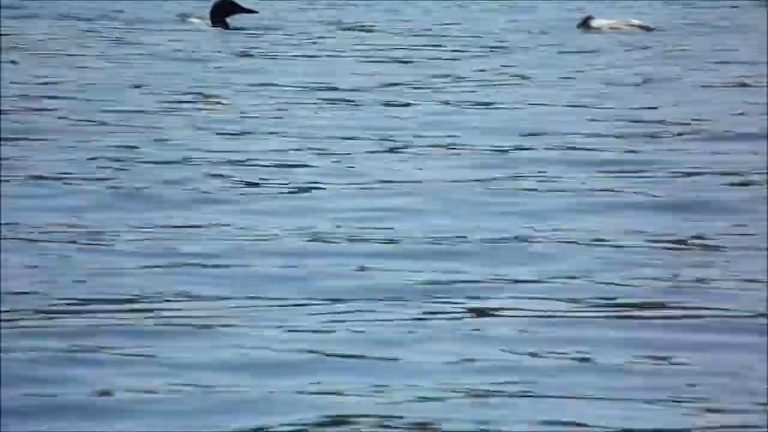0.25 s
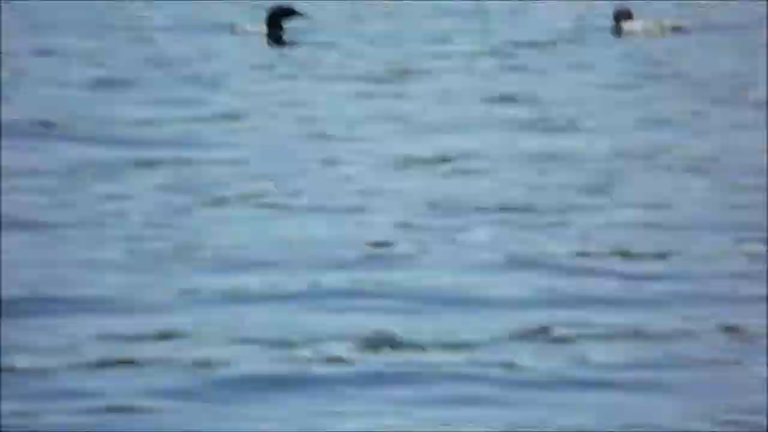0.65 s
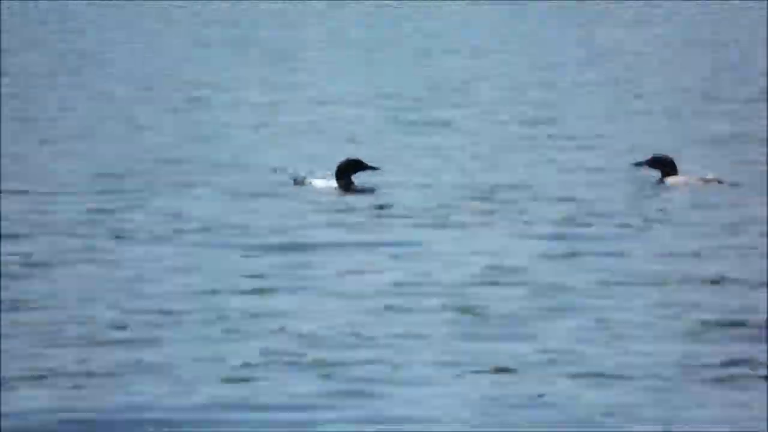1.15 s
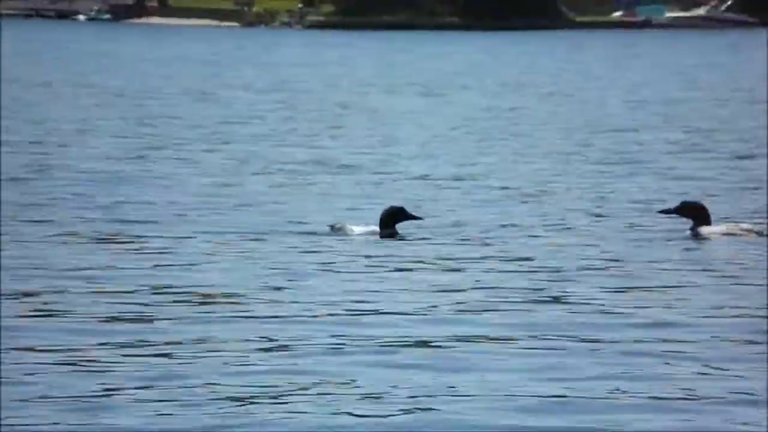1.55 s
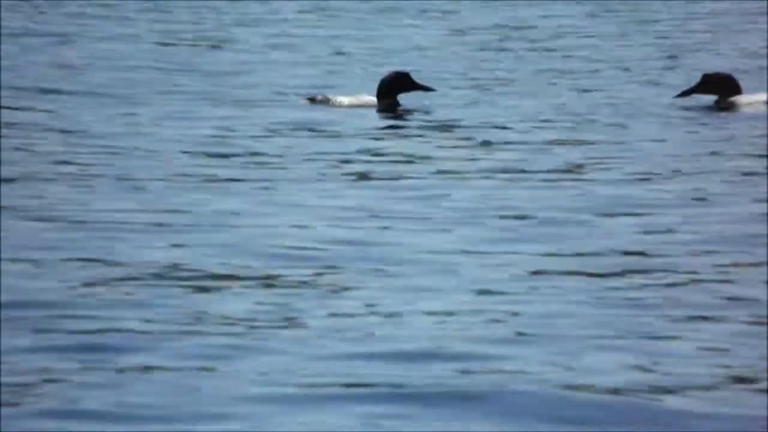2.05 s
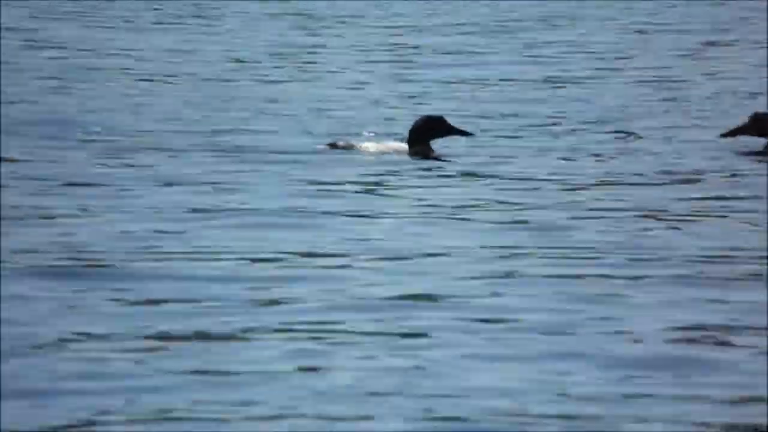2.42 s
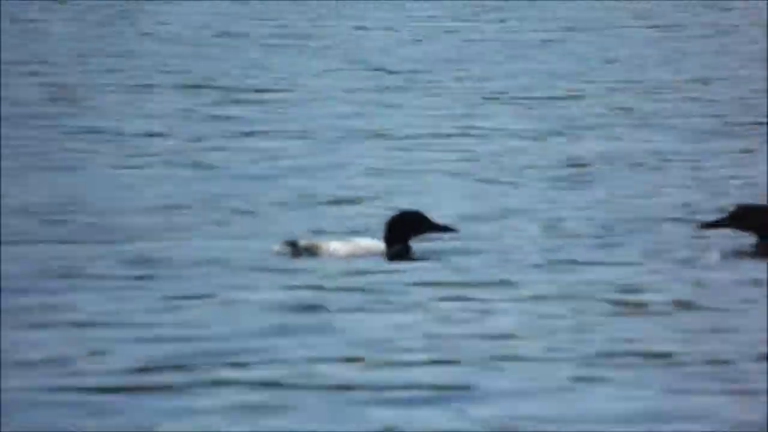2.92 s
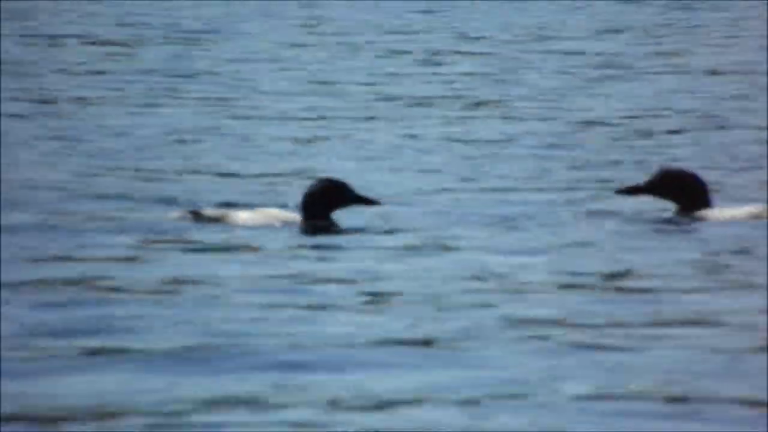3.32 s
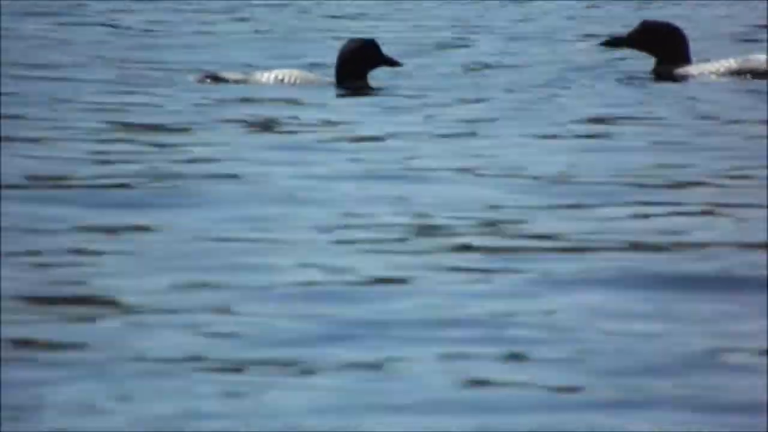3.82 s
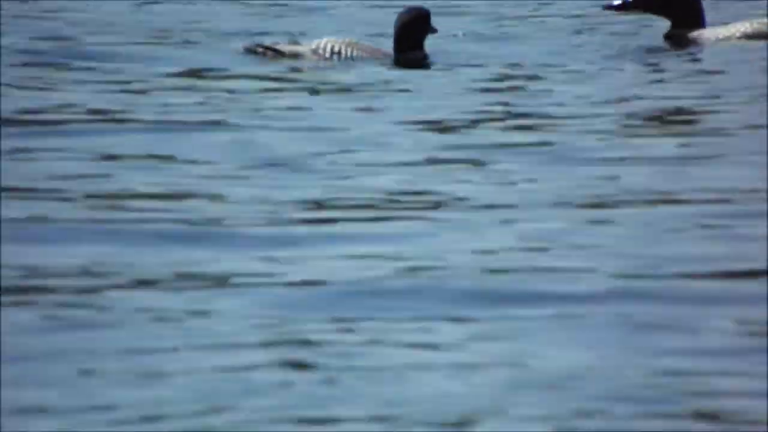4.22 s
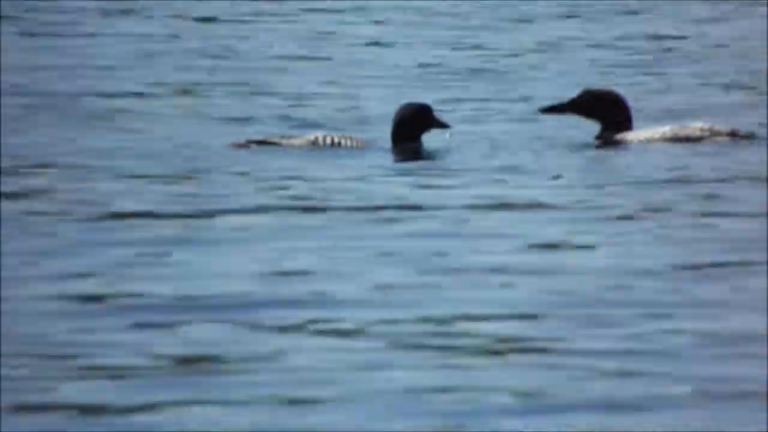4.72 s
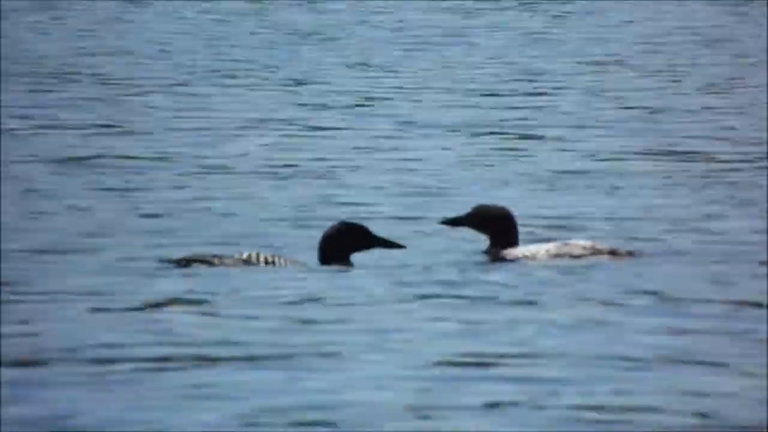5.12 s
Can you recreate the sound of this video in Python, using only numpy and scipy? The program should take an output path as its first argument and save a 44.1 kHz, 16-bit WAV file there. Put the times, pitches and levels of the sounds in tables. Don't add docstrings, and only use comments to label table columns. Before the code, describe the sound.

On a quiet lake, a small camera's built-in microphone picks up faint air, hiss and thin electronic whistle. Fingertips tick softly, then the zoom lever clicks and chatters sharply. A small gear motor rattles the plastic shell for about two seconds, its lens barrel squealing on one wavering note, before it coasts down to scattered clicks, rubs and a faint low bump.

```python
import sys
import numpy as np
from scipy import signal
from scipy.fft import rfft, irfft, next_fast_len
from scipy.io import wavfile
from scipy.ndimage import uniform_filter1d, map_coordinates

SR = 44100
rng = np.random.default_rng(int(sys.argv[2]) if len(sys.argv) > 2 else 0)


def convert_level_to_amplitude(level_db):
    exponent = np.asarray(level_db, float) / 20
    return 10 ** exponent


def to_wav(sig):
    pcm = np.clip(np.atleast_2d(sig), -1, 1) * 32767
    pcm = np.round(pcm).astype(np.int16)
    wavfile.write(sys.argv[1], SR, pcm.T)


N = 236351


def unit(x):
    return x / np.sqrt(np.mean(x ** 2) + 1e-20)


def along(points, hz):
    f, v = np.transpose(points)
    return convert_level_to_amplitude(np.interp(np.log(hz + 1), np.log(f + 1), v))


def wobble(rate):
    knots = rng.standard_normal(int(N * rate / SR) + 4)
    return map_coordinates(knots, [np.arange(N) * rate / SR])


def filtered(x, response):
    m = 2 * next_fast_len(len(x) // 2 + 4096)
    return irfft(rfft(x, m) * response(np.fft.rfftfreq(m, 1 / SR)), m)[:len(x)]


def causal(points):
    def response(hz):
        cepstrum = irfft(np.log(along(points, hz) + 1e-6))
        half = len(cepstrum) // 2
        return np.exp(rfft(np.r_[cepstrum[0], 2 * cepstrum[1:half], cepstrum[half], np.zeros(half - 1)]))
    return response


# [f/Hz, level/dB per Hz]
LAKE_AIR = [(15, -52), (25, -29), (183, -9), (305, -5.5), (359, -7), (762, -2.5), (1570, -7.5),
            (1710, -11.5), (2250, -5), (2600, 2), (3090, -13.5), (7100, -20.5), (9300, -19.5), (10100, -19),
            (10900, -21), (15500, -23)]
# [multiple of its speed, level/dB]
DRIVE_HUM = [(2, -94.5), (3, -82.5), (4, -71), (8, -85), (10, -75.5), (12, -83)]
# [f/Hz, level/dB]
ELECTRONICS = [(9778.7, -64), (11714.6, -95)]
AIR_DB, DRIVE_HZ = -59, 77.2


def background():
    t = np.arange(N) / SR
    noise = filtered(rng.standard_normal(N), lambda hz: along(LAKE_AIR, hz))
    air = convert_level_to_amplitude(AIR_DB + 0.3 * wobble(8)) * unit(noise)
    spin = 2 * np.pi * DRIVE_HZ * t + 0.06 * wobble(5.8)
    hum = sum(convert_level_to_amplitude(db + 1.5 * wobble(6)) * np.sin(k * spin) for k, db in DRIVE_HUM)
    whistle = sum(convert_level_to_amplitude(db) * np.sin(2 * np.pi * hz * t) for hz, db in ELECTRONICS)
    return air + np.sqrt(2) * (hum + whistle)


def through_shell(x):
    return filtered(x, causal([(20, -69), (150, -19.5), (300, 2), (2850, -5), (3400, -8), (6000, -42), (12000, -49)]))


# [f/Hz, t60/s, level/dB]
LOW_MODES = [(328, 0.0081, -8.5), (695, 0.014, -3), (894, 0.018, 3)]
MIDDLE_MODES = [(1190, 0.03, 1), (1344, 0.026, 3), (1580, 0.033, -2.5)]
HIGH_MODES = [(1980, 0.016, -3), (2300, 0.018, 1.5), (2545, 0.022, 0), (2900, 0.041, -20.5)]
# [f/Hz, level/dB]
CRACK = [(2500, -52), (3600, -0.5), (4600, -8), (6000, -15), (9000, -21), (14000, -39)]


def blows(contacts, rings_for=0.88):
    rings, cracks, t = np.zeros(N), np.zeros(N), np.arange(SR // 10) / SR
    modes = np.array(LOW_MODES + MIDDLE_MODES + HIGH_MODES)
    group = np.repeat([-1, 0, 1], [len(LOW_MODES), len(MIDDLE_MODES), len(HIGH_MODES)])[:, None]
    t60 = rings_for * modes[:, 1:2]
    for s, db, tilt_db, crack_db in contacts:
        hz = modes[:, :1] * (1 + 0.015 * rng.standard_normal((len(modes), 1)))
        level_db = modes[:, 2:] + tilt_db * group + 2 * rng.standard_normal((len(modes), 1))
        decay = convert_level_to_amplitude(level_db - 60 * (t / t60) ** 1.026)
        ring = np.sum(decay * np.sin(2 * np.pi * hz * t), axis=0)
        start = round((s + 0.000991) * SR)
        rings[start:][:len(t)] += convert_level_to_amplitude(db + 0.5) * ring * (1 - np.exp(-t / 0.0004))
        burst = convert_level_to_amplitude(db + crack_db + 10.5 - 60 * t / (rings_for * 0.019))
        cracks[start:][:len(t)] += burst * rng.standard_normal(len(t))
    return through_shell(rings) + filtered(cracks, causal(CRACK))


# [t/s, level/dB, tilt/dB toward the high modes]
TICKS = [(0.169, -57, -1), (0.593, -50, -3), (0.637, -50, -5), (0.703, -47, -4.5), (0.818, -61, -3),
         (0.879, -49, -5), (1.307, -51, -9), (3.895, -54.5, -13), (4.184, -51, -8), (4.199, -52, 6),
         (4.367, -52.5, -6), (4.412, -56.5, -10), (4.602, -43, -1.5), (4.907, -46.5, -8), (4.937, -43, -2),
         (4.955, -49.5, -17.5), (4.965, -51, -16), (5.009, -45, -3)]


def fingertips():
    return blows([(*row, -16) for row in TICKS])


def spots(hits):
    out, t = np.zeros(N), np.arange(SR // 10) / SR
    damped = convert_level_to_amplitude(-60 * (t / 0.016) ** 1.62) * (1 - np.exp(-t / 0.00045))
    for s, low_hz, low_db, high_hz, high_db in hits:
        low = convert_level_to_amplitude(low_db) * np.sin(2 * np.pi * low_hz * t)
        high = convert_level_to_amplitude(high_db) * np.sin(2 * np.pi * high_hz * t)
        out[round((s + 0.0012) * SR):][:len(t)] += (low + high) * damped
    return through_shell(out)


# [t/s, level/dB, tilt/dB toward the
# high modes, crack level/dB]
CLICKS = [(1.028, -27, 6, -27), (1.323, -37, 10.5, -29), (1.347, -39.5, 7, -21), (1.366, -40, 4, -10),
          (1.404, -33.5, 5, -29), (1.417, -37, 4, -19), (1.439, -19, -4, -4.5), (1.495, -36, 5, -14),
          (1.515, -31.5, 7.5, -13), (1.56, -35.5, 5.5, -13), (1.572, -47, 6, -16), (1.74, -38.5, 7, -22),
          (1.612, -29, 3, -30), (1.622, -31.5, 14, -29), (1.629, -16.5, -0.3, -9.5), (1.644, -47, -2, -21),
          (1.653, -36, 16, -7), (1.663, -17.5, 9, -19), (1.774, -37, 5, -21), (1.981, -21.5, 2, -9.5),
          (3.144, -20.5, 3.5, -20), (3.635, -32, 5.5, -11), (4.148, -30.5, 0, -15), (4.285, -28, 7.5, 2),
          (4.316, -37, 1, -26), (4.457, -20, 1.4, -8.5), (4.79, -37, 3.5, -23), (4.848, -41.5, 5.5, -26)]
# [t/s, lower f/Hz, its level/dB, upper f/Hz, its level/dB]
LEVER_SPOTS = [(1.028, 960, -30.5, 2520, -20.5), (1.323, 720, -33.5, 2480, -30),
               (1.402, 860, -31, 1580, -27), (1.441, 820, -15, 2640, -24.5),
               (1.513, 1080, -23.5, 2536, -22), (1.629, 1113, -12.5, 2070, -21),
               (1.663, 1250, -18, 2455, -28), (1.981, 870, -23.5, 1780, -26.5),
               (3.144, 1190, -9.5, 1470, -15), (3.633, 1210, -32, 2400, -39), (4.148, 1123, -21, 2680, -31),
               (4.284, 1580, -19.5, 2650, -9.5), (4.285, 2300, -19.5, 2960, -15),
               (1.029, 1250, -38, 1540, -28.5), (1.441, 670, -40, 5150, -10),
               (4.457, 1153, -15, 2020, -16.5), (4.149, 694, -38.5, 3300, -34.5),
               (4.456, 1580, -10.5, 2390, -9), (4.79, 1110, -31, 1505, -29),
               (4.848, 1600, -35.5, 2300, -36)]


def zoom_lever():
    return blows(CLICKS) + spots(LEVER_SPOTS)


# [t/s, rise/s, fall/s, thud level/dB, rub level/dB]
GRIP = [
    (1.37, 0.063, 0.021, -54, -52),
    (1.445, 0.036, 0.13, -59, -48),
    (3.515, 0.044, 0.047, -75, -47.5),
    (3.57, 0.018, .04, -70, -46.5),
    (3.615, 0.052, .045, -48, -51),
    (4.205, .01, .025, -65, -57.5),
    (4.265, 0.079, 0.064, -74, -52),
    (4.908, 0.033, .04, -48.5, -60),
    (4.95, 0.042, 0.23, -54, -57),
]
# [f/Hz, level/dB]
THUD = [(20, -34), (45, -20), (120, -15), (280, 7.5), (450, -2.5), (900, -46.5)]
# [f/Hz, level/dB]
RUB = [(250, -20), (500, -0.5), (850, -3), (1600, -12.5), (1800, -16), (2550, -6), (3200, -25.5),
       (6000, -50)]
GRIP_SLOPE_DB = 16


def grip():
    t, push, slide = np.arange(N) / SR, 0, 0
    for s, rise, fall, thud_db, rub_db in GRIP:
        away = np.where(t < s, (s - t) / rise, (t - s) / fall)
        shift = convert_level_to_amplitude(-GRIP_SLOPE_DB * away) * (away < 1.5)
        push = push + convert_level_to_amplitude(thud_db) * shift
        slide = slide + convert_level_to_amplitude(rub_db) * shift
    thud = unit(convert_level_to_amplitude(3.8 * wobble(25)) * filtered(rng.standard_normal(N), causal(THUD)))
    rub = unit(convert_level_to_amplitude(4.5 * wobble(100)) * filtered(rng.standard_normal(N), causal(RUB)))
    return convert_level_to_amplitude(-3) * push * thud + slide * rub


# [first t/s, gap/s, next gap over it, level/dB, level change/dB a contact]
CHATTER = [
    (1.4466, .0068, 1.01, -31, -1.1),
    (1.526, 0.011, 0.96, -38, -0.5),
    (1.699, .012, .92, -40, 0.36),
]
CHATTER_TILT_DB = [-1.5, 6, 8.5]
CONTACTS = [7, 3, 8]
# [lower f/Hz, level/dB over the contact, upper f/Hz, level/dB over it]
SPRING = (1020, 3, 2560, -8)


def chatter():
    rows = []
    for (s, gap, ratio, db, step_db), tilt_db, count in zip(CHATTER, CHATTER_TILT_DB, CONTACTS):
        for k in range(count):
            rows.append((s, db + step_db * k - 2.5 * (k % 2), tilt_db, -18))
            s += gap * ratio ** k
    low_hz, low_db, high_hz, high_db = SPRING
    spring = [(s, low_hz, db + low_db, high_hz, db + high_db) for s, db, *_ in rows[:CONTACTS[0]]]
    return blows(rows, rings_for=0.65) + spots(spring)


def teeth(rate_hz, jitter, scatter_db, noisy):
    turns = np.cumsum(rate_hz * (1 + jitter * wobble(60))) / SR
    meets = np.diff(np.floor(turns), prepend=0) * convert_level_to_amplitude(scatter_db * wobble(120))
    u = np.arange(SR // 20) / SR / 0.0021
    scrape = signal.fftconvolve(meets, u * np.exp(-u))[:N]
    knock = 0.4 * unit(meets)
    return (unit(np.abs(scrape)) + noisy) * rng.standard_normal(N) + knock


# [f/Hz, level/dB per Hz]
SHELL = [(560, -43), (960, -11), (1080, -7), (1170, -1.5), (1390, -9.5), (1610, -6), (1940, -11.5),
         (2210, -11), (2390, 0), (2520, 1), (2740, -13), (2950, -6.5), (3240, -20), (3850, -23),
         (4250, -32.5), (4580, -27.5), (5500, -41.5), (7150, -70.5)]
# [f/Hz, level/dB]
GRIT = [(4000, -25.5), (5700, 12), (6500, 11.5), (8300, 12), (10000, -9), (13000, -26)]
# [f/Hz, level/dB per Hz]
SHUDDER = [(18, -72), (30, -35.5), (202, -11), (453, -8), (509, -1), (590, -6.5), (683, -1), (839, -4.5),
           (929, -13.5), (1000, -6.5), (1300, -35), (2200, -120)]
ENGAGE_S, RUN_S, OFF_S, REST_S = 1.612, 1.745, 3.488, 3.72
JOLT_DB, JOLT_FADES_DB_PER_S = -33, 155
RUN_DB, LOAD_GROWS_DB = -41, 2
COAST_DB, COAST_FADES_DB_PER_S = -57, 83
JOLT_SHUDDER_DB, SHUDDER_DB, SHUDDER_GROWS, COAST_SHUDDER_DB = -8.5, -13, 2.2, 8
JOLT_RING_DB, RING_DB = -20, -4
SHAFT_HZ, SHAFT_DB = 63, 3
CAM_HZ, CAM_TOP_S, CAM_DB = 31.13, 2.338, 5


def motor():
    t = np.arange(N) / SR
    load_db = LOAD_GROWS_DB * (t - RUN_S) / (OFF_S - RUN_S)

    def stage(start, end):
        return uniform_filter1d(((t > start) & (t < end)) * 1.0, size=60)

    jolt = stage(ENGAGE_S, RUN_S) * convert_level_to_amplitude(JOLT_DB - JOLT_FADES_DB_PER_S * np.abs(t - ENGAGE_S))
    run = stage(RUN_S, OFF_S) * convert_level_to_amplitude(RUN_DB)
    coast = stage(OFF_S, REST_S) * convert_level_to_amplitude(COAST_DB - COAST_FADES_DB_PER_S * np.abs(t - OFF_S))
    rubbing = np.interp(t, [RUN_S, OFF_S], [1.7, 0.8])
    gears = teeth(94.5, jitter=0.05, scatter_db=2.6, noisy=rubbing)

    turn = np.sin(2 * np.pi * SHAFT_HZ * t + 0.5 * wobble(6.6))
    half_turn = np.sin(np.pi * SHAFT_HZ * t)
    shaft = convert_level_to_amplitude(SHAFT_DB * turn + 2.3 * half_turn)
    hiss = unit(filtered(shaft * gears, causal(GRIT)))
    rattle = unit(filtered(gears, causal(SHELL))) + convert_level_to_amplitude(-33) * hiss
    rattling = jolt + convert_level_to_amplitude(load_db) * run + coast

    shudder = unit(convert_level_to_amplitude(2.4 * wobble(29.78)) * filtered(gears, causal(SHUDDER)))
    shaking = convert_level_to_amplitude(JOLT_SHUDDER_DB) * jolt + convert_level_to_amplitude(COAST_SHUDDER_DB) * coast
    shaking += convert_level_to_amplitude(SHUDDER_DB + SHUDDER_GROWS * load_db) * run

    cam_db = CAM_DB * np.cos(2 * np.pi * CAM_HZ * (t - CAM_TOP_S))
    singing = convert_level_to_amplitude(JOLT_RING_DB) * jolt + convert_level_to_amplitude(RING_DB + cam_db) * run + coast
    return convert_level_to_amplitude(2) * (rattling * rattle + shaking * shudder) + barrel(singing)


# [t/s, peak level/dB]
SLIPS = [(1.94, -29.5), (2.119, -34), (2.33, -29.5), (2.493, -33), (2.594, -28.5), (2.77, -30),
         (2.863, -22.5), (2.932, -20), (2.962, -23.5), (2.997, -22.5), (3.07, -28), (3.129, -21.5),
         (3.196, -27.5), (3.236, -23), (3.265, -17.5), (3.294, -19), (3.332, -30), (3.368, -29),
         (3.418, -30), (3.463, -23.5), (3.49, -31), (3.516, -35.5), (3.565, -28.5), (3.622, -26),
         (3.655, -40)]
BARREL_HZ, SLIP_RISE_S, SLIP_T60_S = 1179, 0.0054, 0.099


def barrel(singing):
    swell = singing * convert_level_to_amplitude(2.5 * wobble(65) + 2.5 * wobble(14))
    t = np.arange(SR // 4) / SR
    for s, db in SLIPS:
        rise = 1 - np.exp(-(t / SLIP_RISE_S) ** 2)
        swell[round(s * SR):][:len(t)] += convert_level_to_amplitude(db - 60 * t / SLIP_T60_S) * rise
    wander = 1.2 * wobble(30) + 0.28 * wobble(150)
    return swell * np.sin(2 * np.pi * BARREL_HZ * np.arange(N) / SR + wander)


# [t/s, level/dB, tilt/dB toward the high modes]
CATCHES = [(2.07, -34.5, -9), (2.175, -33, -7.5), (2.799, -37.5, -5.5), (2.907, -24, 5.5), (2.937, -40, -4),
           (3.071, -28, -1), (3.199, -29, -5), (3.236, -35.5, -8), (3.275, -37.5, -11), (3.469, -37, -5),
           (3.565, -48, .3), (3.599, -41.5, -8)]


def lens_catches():
    return blows([(*row, -22) for row in CATCHES])


# [f/Hz, level/dB]
SWAY = [(15, -20), (40, -8), (120, -5), (250, -7), (600, -63)]


def bump():
    t = np.arange(N) / SR
    swell = unit(filtered(rng.standard_normal(N), causal(SWAY)))
    sway = convert_level_to_amplitude(-63) * np.exp(-((t - 5) / 0.1) ** 2) * swell
    hollow = convert_level_to_amplitude(-37.5) * np.exp(-((t - 4.958) / 0.0063) ** 2) * np.sin(2 * np.pi * 862 * t)
    return sway + hollow


def scene():
    handling = fingertips() + zoom_lever() + grip() + chatter()
    mono = background() + handling + motor() + lens_catches() + bump()
    return np.tile(mono, (2, 1))


def roll_off(x):
    return signal.sosfilt(signal.butter(12, 15700, fs=SR, output="sos"), x)


def record(dry):
    low_cut_hz = 35
    right = dry[0] / (1 + np.abs(dry[0] / 0.36) ** 6) ** (1 / 6)
    right = filtered(right, lambda hz: (1j * hz / (low_cut_hz + 1j * hz)) ** 2)
    left = np.roll(right, shift=1)
    return roll_off(np.array([left, right]))


dry = scene()
out = record(dry)
to_wav(out)
```